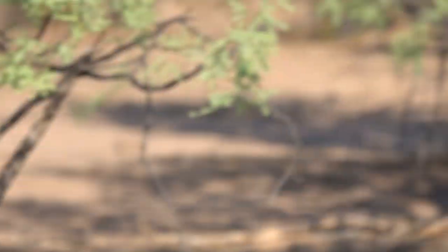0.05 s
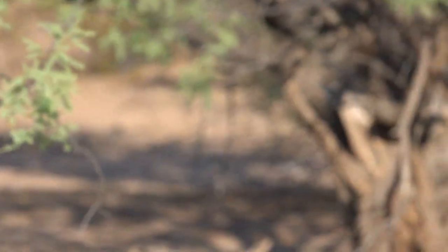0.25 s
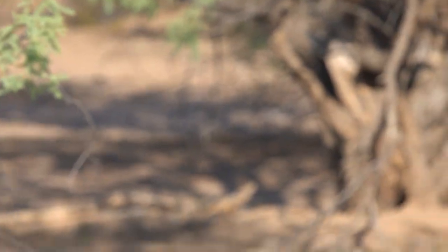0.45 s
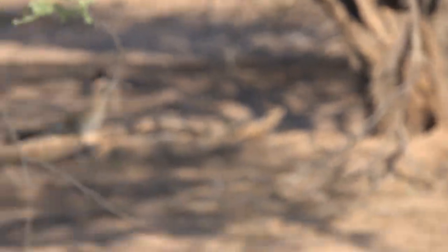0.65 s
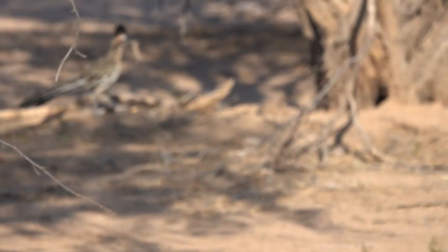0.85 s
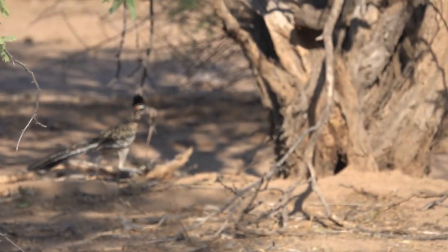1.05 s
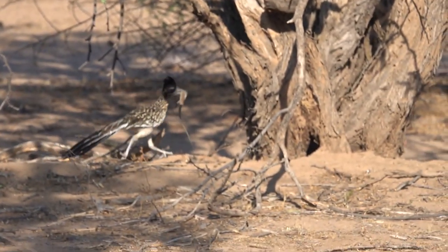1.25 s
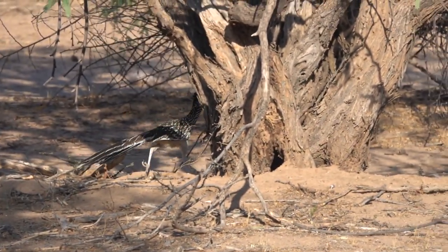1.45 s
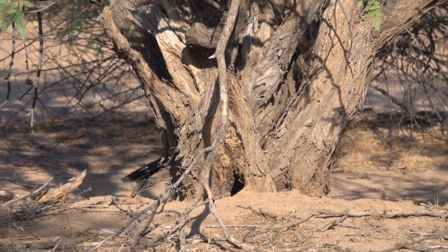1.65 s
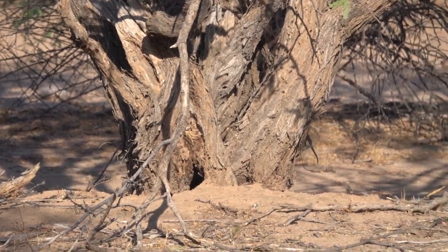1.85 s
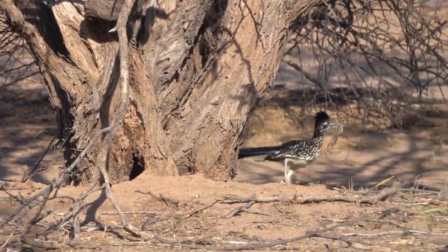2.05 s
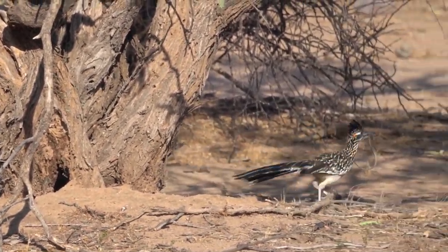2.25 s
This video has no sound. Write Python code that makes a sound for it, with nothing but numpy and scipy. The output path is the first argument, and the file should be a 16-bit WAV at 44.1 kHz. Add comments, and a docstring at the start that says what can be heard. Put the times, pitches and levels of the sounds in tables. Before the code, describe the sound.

A constant, bright, raspy cicada drone over a blurred distant chorus, outdoors. Dull handling thumps and scuffs come first, close on the microphone; afterwards a low mechanical hum, a few dry twig snaps and tiny gear ticks.

```python
"""Cicadas in dry woodland

Two near cicadas click about 160 times a second, ringing their bodies, over a blurred far chorus of shaped noise.
The hand-held recorder is swung round: quick pushes make its shell knock, and grainy noise makes it rub.
A small motor inside hums with sine waves, rattles, whines and ticks; a few twigs crackle as bursts of noise.
A faint noise of air lies underneath."""
import sys
import numpy as np
from scipy import signal
from scipy.fft import rfft, irfft, next_fast_len
from scipy.io import wavfile
from scipy.ndimage import map_coordinates

SR = 44100
rng = np.random.default_rng(int(sys.argv[2]) if len(sys.argv) > 2 else 0)


def voltage_ratio(level):
    """Linear amplitude factor for a level in decibels (scalar or array-like)."""
    return 10 ** (np.asarray(level, float) / 20)


def dump_mix(stems):
    """Bounce the given channels to the path in sys.argv[1] as a 16-bit WAV at rate SR."""
    frames = np.atleast_2d(stems).T  # one column per channel
    limited = np.clip(frames, -1, 1)  # hard clip at full scale
    pcm = np.round(limited * 32767).astype(np.int16)
    wavfile.write(sys.argv[1], SR, pcm)


N = 101429  # length [samples]

# how much louder the left side is than the right: (pitch [Hz], left over right [dB])
LEFT_RIGHT_LEAN = [(100, -.4), (700, 0), (5000, -1), (10000, 5)]


def in_time(rows):
    """Joins the points of a table by straight lines in time, one curve for each column."""
    times_s, *columns = np.transpose(rows)
    return [np.interp(np.arange(N) / SR, times_s, column) for column in columns]


def at_hz(points, hz):
    """Reads a spectrum table between its points, with pitch on a log axis."""
    table_hz, table_db = np.array(points)[:, 0], np.array(points)[:, 1]
    return np.interp(np.log(np.maximum(hz, 1)), np.log(table_hz), table_db)


def rms_one(x):
    """Scales a sound to an average (rms) strength of 1."""
    return x / np.sqrt(np.mean(x ** 2) + 1e-20)


def drift(rate_hz):
    """Wanders by chance with a spread of 1: smoothed noise, made at every 40th sample."""
    r = np.exp(-80 * np.pi * rate_hz / SR)
    noise = rng.standard_normal(N // 40 + 2002)
    slow = signal.lfilter([1], [1, -2 * r, r * r], noise)[2000:]  # drops the filter's start
    return np.interp(np.arange(N) / 40, np.arange(len(slow)), rms_one(slow))


def resonate_twice(x, hz, width_hz):
    """Favours one pitch, as a hollow body does: two equal resonances in a row, gain 1 at the top."""
    r = np.exp(-np.pi * width_hz / SR)
    top = np.array([1, 0, -1]) * (1 - r * r) / 2
    bottom = [1, -2 * r * np.cos(2 * np.pi * hz / SR), r * r]
    return signal.lfilter(top, bottom, signal.lfilter(top, bottom, x))


def ring(x, modes):
    """Sets a solid ringing: each mode is a sine that dies away by 60 dB in its own time."""
    out = 0
    for hz, db, t60_s in modes:
        r, w = voltage_ratio(-60 / (t60_s * SR)), 2 * np.pi * hz / SR
        out = out + signal.lfilter([0, voltage_ratio(db) * np.sin(w)], [1, -2 * r * np.cos(w), r * r], x + 1e-18)
    return out


def colour(pair, spectrum):
    """Shapes two unrelated noises into a stereo pair of rms 1: the shared part makes the sides alike."""
    # how alike left and right are: (pitch [Hz], likeness [0 to 1])
    likeness = [(150, 1), (550, 0.86), (4000, 0.17), (12000, 0.55)]
    size = next_fast_len(N)
    hz = np.arange(size // 2 + 1) * SR / size
    audible = hz > .7 * spectrum[0][0]  # nothing far below the first point
    mid, side = rfft(pair, size) * voltage_ratio(at_hz(spectrum, hz)) * audible
    alike = np.clip(at_hz(likeness, hz), 0, 1)
    lean = voltage_ratio(at_hz(LEFT_RIGHT_LEAN, hz) / 2 * [[1], [-1]])
    both = np.sqrt(1 + alike) * mid + np.sqrt(1 - alike) * side * [[1], [-1]]
    return rms_one(irfft(lean * both, size)[:, :N])


def ports(sound):
    """Carries sound through the shell to two ports: levels lean by pitch, and the left leads in phase."""
    size = next_fast_len(N)
    hz = np.arange(size // 2 + 1) * SR / size
    lead_rad, lead_hz = .42, 600  # sets the size of the lead and the pitch it is greatest near
    lead = lead_rad * np.sqrt(hz / lead_hz) * 2 / (1 + (hz / lead_hz) ** 2) ** .5
    lean = voltage_ratio(at_hz(LEFT_RIGHT_LEAN, hz) / 2 * [[1], [-1]])
    return irfft(rfft(sound, size) * lean * np.exp(.5j * lead * [[1], [-1]]), size)[:, :N]


def cicadas():
    """Sings near and far; an echo off the ground combs the sound, and all fade as the recorder turns away."""
    # near singers: (click rate [per s], body pitch [Hz], width of each resonance [Hz],
    # level [dB], left over right [dB], delay of the left side [s])
    near_singers = [(160.9, 9500, 2640, -51, 4, -.00012), (153, 9880, 2100, -51.5, -1.5, -.0001)]
    # fading as the recorder turns, of which only the changes count: (time [s], level [dB])
    facing_points = [(0, -43.5), (1.3, -45), (1.7, -46.5)]
    # colour of the far singers: (pitch [Hz], relative level per Hz [dB])
    chorus_colour = [(5030, -37.5), (5490, -13), (6350, 0.5), (7200, -11.5), (9100, 2), (11300, -3.5),
                     (13500, -15), (15500, -23)]
    # delay of the ground echo as the recorder moves: (time [s], delay [ms])
    ground_delay = [(0, .445), (.16, .412), (.5, .43), (1.4, .428), (2.3, .414)]
    chorus_db, chorus_follows, ground_db = -49, 2.1, -8  # the chorus fades 2.1 times as much in dB

    facing_db, = in_time(facing_points)
    facing_db = facing_db - facing_db.mean()
    chorus = colour(rng.standard_normal((2, N)), chorus_colour) * voltage_ratio(chorus_db)
    near = voltage_ratio(facing_db) * sum(singer(*row) for row in near_singers)
    direct = near + voltage_ratio(chorus_follows * facing_db) * chorus
    earlier = np.arange(N) - in_time(ground_delay)[0] * SR / 1000
    echo = np.array([map_coordinates(side, [earlier], mode="mirror") for side in direct])
    return direct + voltage_ratio(ground_db) * echo


def singer(rate, hz, width_hz, db, pan_db, lag_s):
    """Rings an insect's body with a steady train of uneven click pairs, the weaker click first."""
    tempo_drift, jitter_s, spread_db = .0015, .0001, 2  # wander of the rate as a share; unevenness
    lead_click_s, lead_click_db = .0013, -6
    turns = np.cumsum(rate * (1 + tempo_drift * drift(1.0))) / SR + rng.random()
    at = np.flatnonzero(np.diff(np.floor(turns)))
    chance = rng.standard_normal((len(at), 4))
    clicks = np.zeros(N + SR)
    for k, (early_s, click_db) in enumerate([(0, 0), (lead_click_s, lead_click_db)]):
        where = np.maximum(at + SR * (jitter_s * chance[:, k] - early_s), 0).astype(int)
        np.add.at(clicks, where, voltage_ratio(click_db + spread_db * chance[:, 2 + k]))
    body = voltage_ratio(db) * rms_one(resonate_twice(clicks[:N], hz, width_hz))
    left = np.roll(body, int(round(lag_s * SR))) * voltage_ratio(pan_db / 2)
    return np.array([left, body * voltage_ratio(-pan_db / 2)])


def knocks():
    """Knocks the shell with short, sudden inward pushes; it springs back and rings."""
    # pushes: (time [s], height before filtering [dB], sharpness, one over the length [Hz])
    knock_pushes = [(0.2054, -8.5, 694), (0.2185, -12, 750), (.2203, -13.5, 380), (0.2272, -17.5, 306),
                    (0.2512, -13.5, 504), (0.2556, -16.5, 595), (.2838, -15.5, 487), (0.4242, -21.5, 304),
                    (0.4402, -15.5, 750), (.4484, -9, 650), (0.4565, -16.5, 484), (0.66, -23.5, 283),
                    (0.6727, -20.5, 240), (0.7191, -15.5, 665), (.7280, -22, 317)]
    # ringing of the shell: (pitch [Hz], relative level [dB], time to fall by 60 dB [s])
    shell_modes = [(124, -6, 0.059), (235, -11, 0.038), (444, -8.5, 0.017)]
    push = np.zeros(N)
    for s, db, sharp_hz in knock_pushes:
        t = np.arange(int(SR / sharp_hz)) * sharp_hz / SR
        push[int(s * SR):][:len(t)] += voltage_ratio(db) * np.sin(np.pi * t ** .8) ** 2  # rises faster than it falls
    ringing = ring(np.roll(push, 40), shell_modes) * voltage_ratio(-35)  # starts 40 samples later
    inward = -signal.lfilter([1, -1], [1, -.992], push)  # the bass cut makes it spring back
    return ports(ringing + inward)


def handling():
    """Rubs skin on the shell in grains of noise, brighter when hard; the swing adds a low rumble."""
    # how hard the hand rubs: (time [s], level [dB])
    grip_points = [(0, -41.5), (.1, -44), (.17, -51.5), (.21, -34), (.27, -34.5), (.31, -50.5), (.44, -41),
                   (.475, -47), (.492, -38), (.55, -51), (.66, -42), (.76, -55), (.83, -49.5),
                   (1.03, -51.5), (1.08, -56.5), (1.6, -57), (1.68, -64.5)]
    # colour of the rubbing: (pitch [Hz], relative level per Hz [dB])
    rub_colour = [(230, -1.5), (370, 2.5), (620, -3.5), (1400, -3), (2300, -17.5), (4500, -67)]
    # strength of the rumble of the swing: (time [s], level [dB])
    sway_points = [(0, -45), (.4, -40.5), (.58, -38), (.76, -45.5), (.82, -53.5), (1.6, -45), (2.0, -52)]
    # colour of that rumble: (pitch [Hz], relative level per Hz [dB])
    rumble_colour = [(32, 10), (110, 14), (400, -29.5)]
    grains_per_s = 1000
    scuff_db, scuff_follows = -70.5, 1.55  # bright hiss: level at a grip of -47 dB, dB gained per dB of grip

    grip_db, = in_time(grip_points)
    grain_here = rng.random(N) < grains_per_s / SR
    grains = 0.46 + grain_here * voltage_ratio(2.0 * np.minimum(rng.exponential(1, N), 3))
    rub = colour(rng.standard_normal((2, N)) * grains, rub_colour) * voltage_ratio(grip_db + 1.84 * drift(57.0))
    scuff = colour(rng.standard_normal((2, N)) * grains, [(1500, 0), (5360, -6.0), (9000, -30.0)])
    scuff = scuff * voltage_ratio(scuff_db + scuff_follows * (grip_db + 47.0))
    rumble = colour(rng.standard_normal((2, N)), rumble_colour) * voltage_ratio(in_time(sway_points)[0])
    return rub + scuff + rumble


def motor():
    """Turns steadily: sines at multiples of its rate waver with load, over a rattle, gear noise and ticks."""
    # load on the motor: (time [s], level [dB])
    load_points = [(0, -20.5), (.8, -1), (1.05, -4.5), (1.35, -1.5), (1.7, -2.5), (1.95, 3), (2.1, 0.5),
                   (2.3, -6)]
    # hum: (multiple of the turning rate, level at load 0 [dB], dB gained per dB of load)
    hum_tones = [(4, -47, 0.32), (6, -39.5, 1.5), (8, -41, 1.13), (9, -46.5, 4.14), (12, -61, 2.1)]
    # gear noise: (pitch [Hz], width of each resonance [Hz], level [dB])
    whine_bands = [(1720, 200, -71), (2850, 140, -77)]
    # gear ticks: (time [s], level of the click that starts the ringing [dB])
    gear_ticks = [(1.7545, -51.5), (1.9046, -55), (1.9805, -63.5), (2.0560, -54), (2.2072, -56)]
    # ringing of a tick: (pitch [Hz], relative level [dB], time to fall by 60 dB [s])
    tick_modes = [(5260, -2, .012), (7460, 9, 0.011)]
    turns_hz, waver_db, waver_hz = 19.84, 2, 1.86
    rattle_hz, rattle_width_hz, rattle_db, rattle_lag_s = 336, 198, -60.5, .09
    whine_from_s = 1.6  # the gears engage

    load_db, = in_time(load_points)
    turn = 2 * np.pi * turns_hz * np.arange(N) / SR
    hum = 0
    for k, db, share in hum_tones:
        height = np.sqrt(2) * voltage_ratio(db + share * load_db + waver_db * drift(waver_hz))
        hum = hum + height * np.sin(round(k) * turn + 0.31 * drift(5.9) + 2 * np.pi * rng.random())

    # loose parts buzz under load; they shake loose a little later
    late_load_db = np.roll(load_db, int(rattle_lag_s * SR))
    buzz = rms_one(resonate_twice(rng.standard_normal(N), rattle_hz, rattle_width_hz))
    rattle = voltage_ratio(rattle_db + 2 * late_load_db) * buzz

    whine = sum(voltage_ratio(db) * rms_one(resonate_twice(rng.standard_normal(N), hz, width))
                for hz, width, db in whine_bands)
    engaged = np.clip((np.arange(N) / SR - whine_from_s) * 10, 0, 1)  # fades in over 0.1 s
    clicks = np.zeros(N)
    s, db = np.transpose(gear_ticks)
    clicks[(s * SR).astype(int)] = voltage_ratio(db)
    return ports(hum + rattle + whine * engaged) + ring(clicks, tick_modes)


def twigs():
    """Snaps dry wood: a brief burst of fibre cracks, then a fainter rustle, sets it ringing."""
    # snaps: (time [s], peak of the burst before ringing [dB], top of the crack [Hz])
    twig_snaps = [(1.312, -46, 5000), (1.3203, -31.5, 2400), (1.348, -39.5, 3000), (1.3858, -28, 3280),
                  (1.506, -43, 2820), (1.594, -47, 1290)]
    # ringing of the wood: (pitch [Hz], relative level [dB], time to fall by 60 dB [s])
    wood_modes = [(1100, -30, .012), (1600, -29, .010)]
    crack_s, rustle_s, rustle_db = .0022, .022, -21  # fading times and the rustle's relative level
    cracks = np.zeros((2, N))  # middle and side
    t = np.arange(SR // 10) / SR
    fade = np.exp(-t / crack_s) + voltage_ratio(rustle_db) * np.exp(-t / rustle_s)
    for s, db, top_hz in twig_snaps:
        burst = rng.standard_normal((2, len(fade))) * [[1], [.4]] * fade
        burst = signal.sosfilt(signal.butter(2, [500, top_hz], "band", fs=SR, output="sos"), burst)
        cracks[:, int(s * SR):int(s * SR) + len(fade)] += voltage_ratio(db) * burst / np.abs(burst[0]).max()
    mid, side = cracks + ring(cracks, wood_modes)
    return np.array([mid + side, mid - side])


def air():
    """Lays down a faint, steady air noise, strongest in the bass."""
    # colour of the air: (pitch [Hz], relative level per Hz [dB])
    air_colour = [(250, -1.5), (900, -26), (3300, -28), (4500, -72)]
    return voltage_ratio(-60) * colour(rng.standard_normal((2, N)), air_colour)


def scene():
    """Adds all the sources together."""
    return cicadas() + knocks() + handling() + motor() + twigs() + air()


def top_cut(x):
    """Nothing passes above the cut-off."""
    return signal.sosfilt(signal.butter(12, 16270, fs=SR, output="sos"), x)


def record(dry):
    """Cuts the lowest bass, below about 22 Hz, to finish the mix."""
    finished = signal.sosfilt(signal.butter(2, 22, "high", fs=SR, output="sos"), dry)
    return top_cut(finished)


dry = scene()
out = record(dry)
dump_mix(out)
```